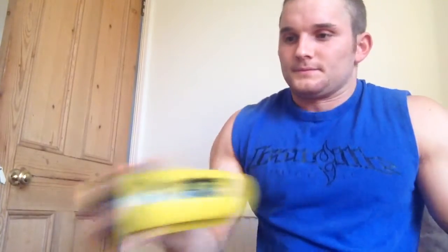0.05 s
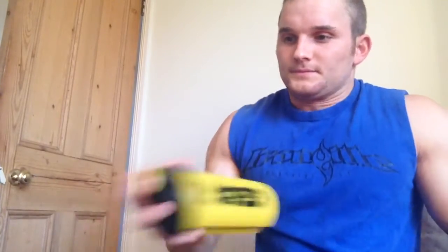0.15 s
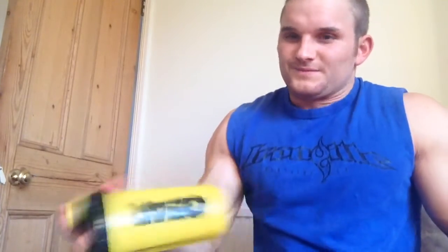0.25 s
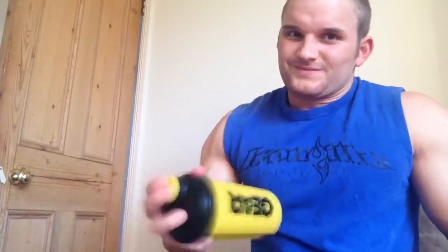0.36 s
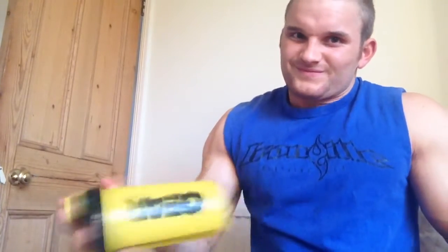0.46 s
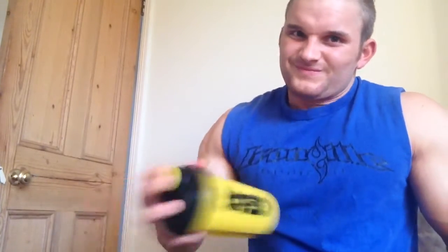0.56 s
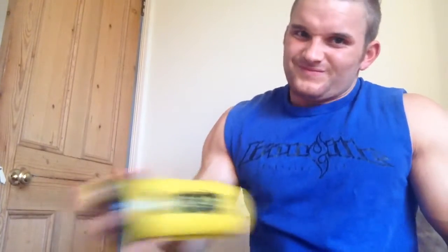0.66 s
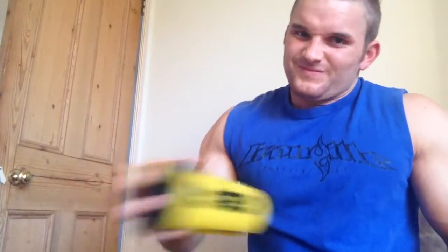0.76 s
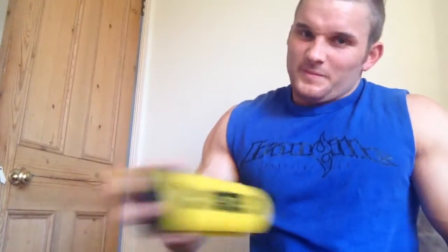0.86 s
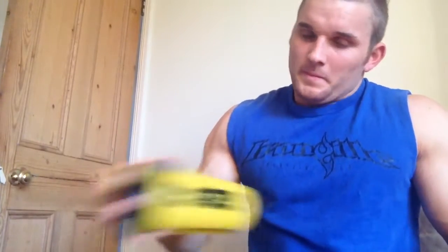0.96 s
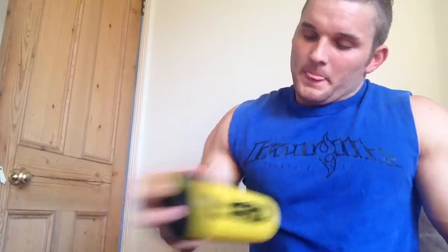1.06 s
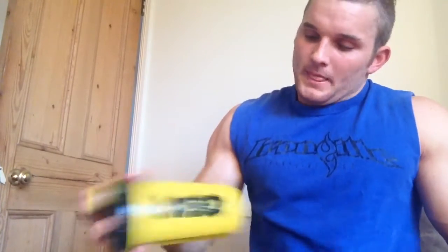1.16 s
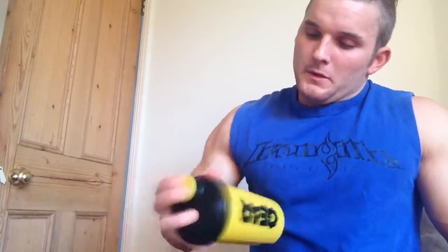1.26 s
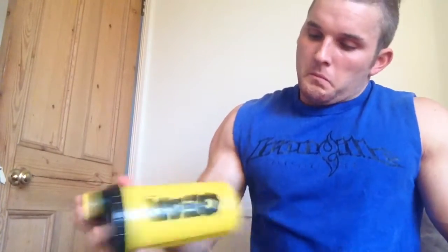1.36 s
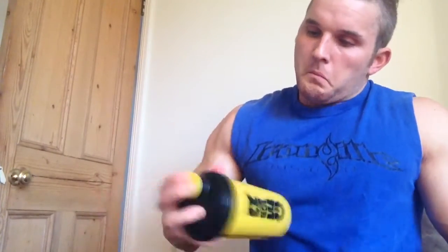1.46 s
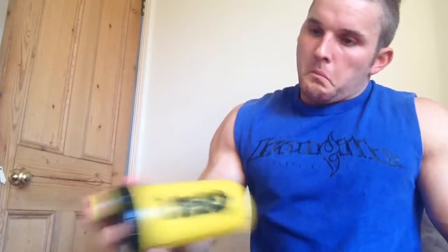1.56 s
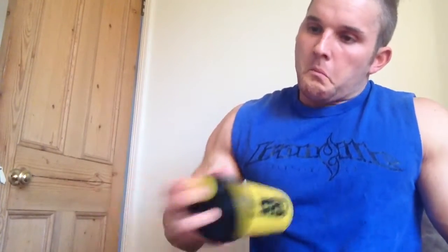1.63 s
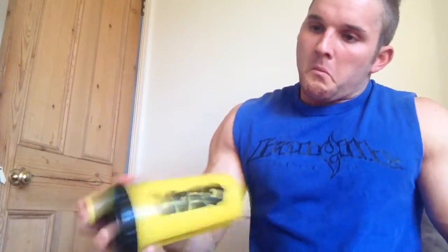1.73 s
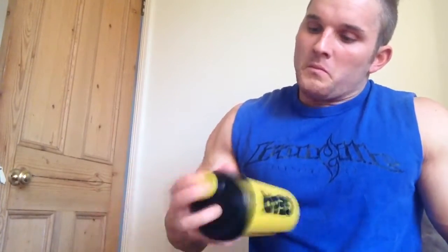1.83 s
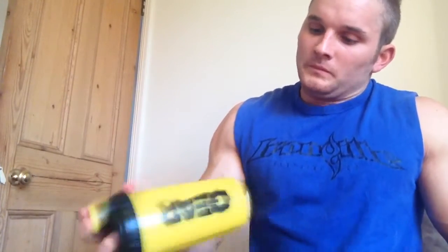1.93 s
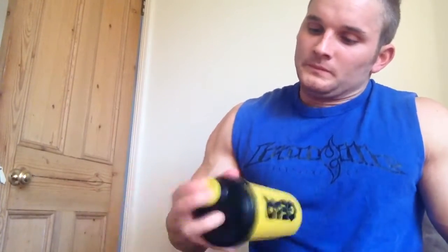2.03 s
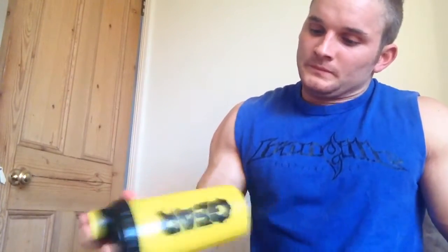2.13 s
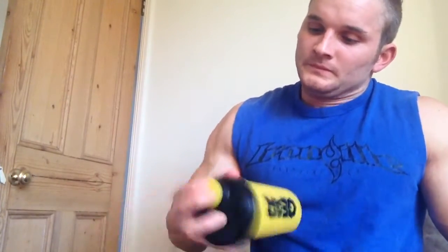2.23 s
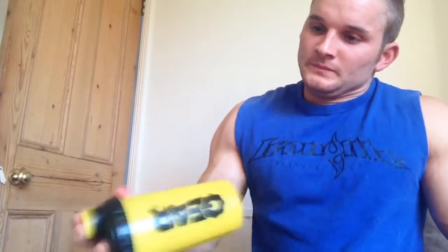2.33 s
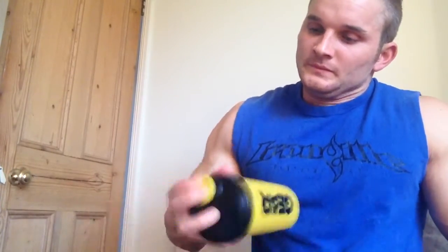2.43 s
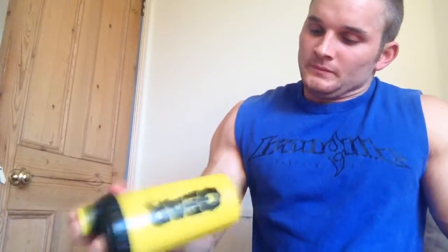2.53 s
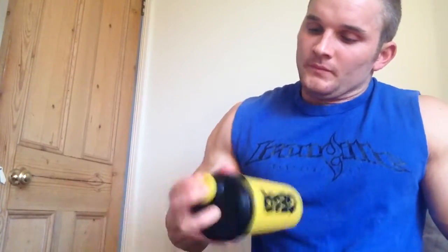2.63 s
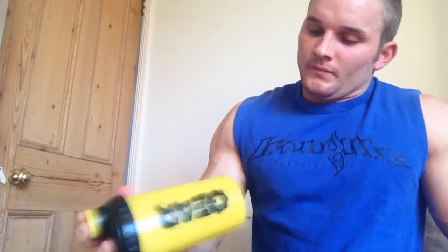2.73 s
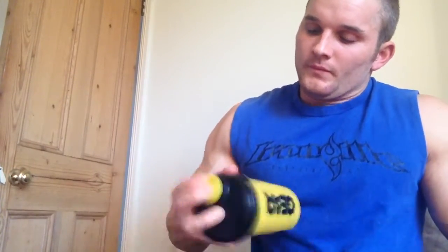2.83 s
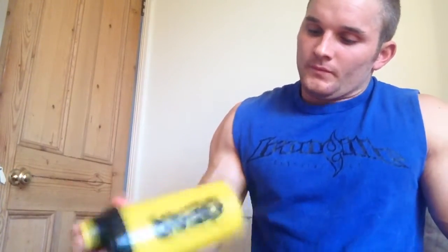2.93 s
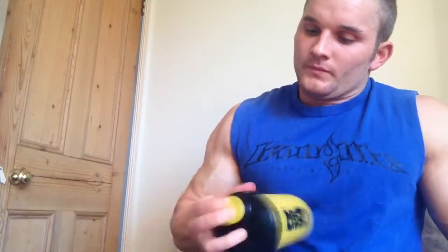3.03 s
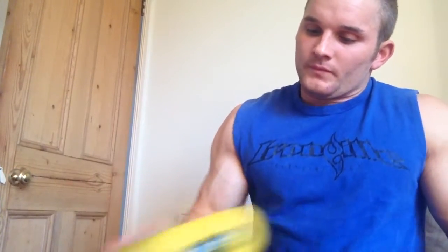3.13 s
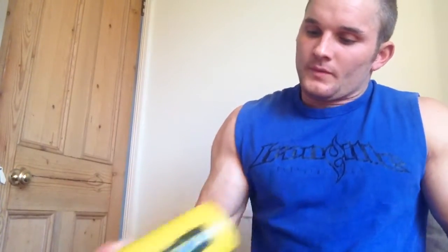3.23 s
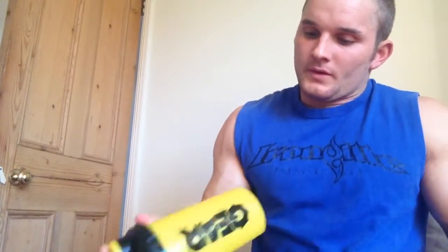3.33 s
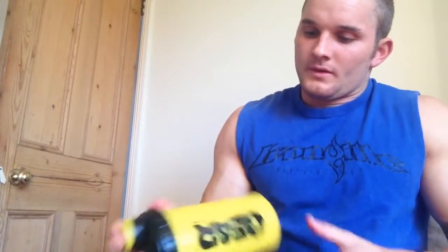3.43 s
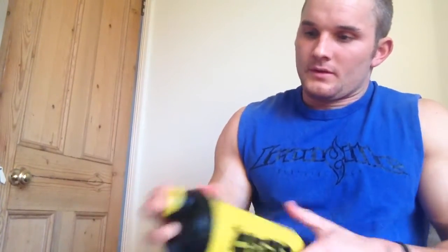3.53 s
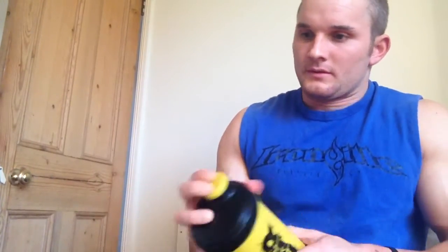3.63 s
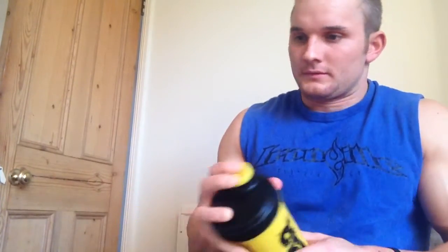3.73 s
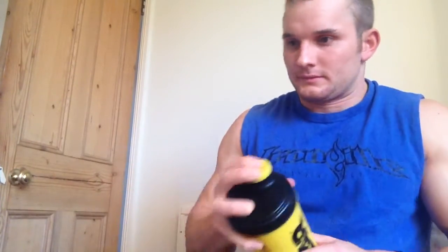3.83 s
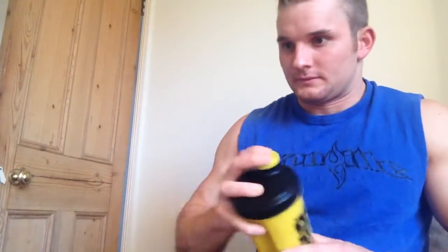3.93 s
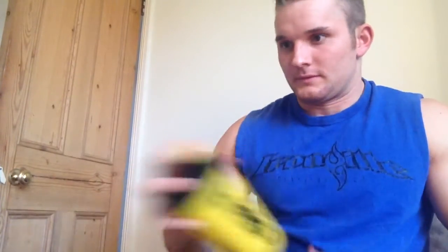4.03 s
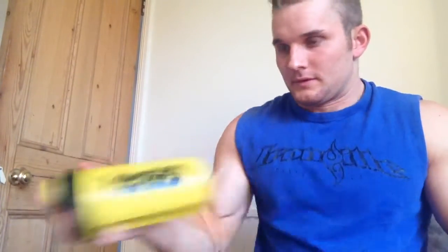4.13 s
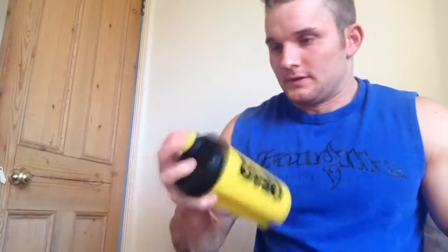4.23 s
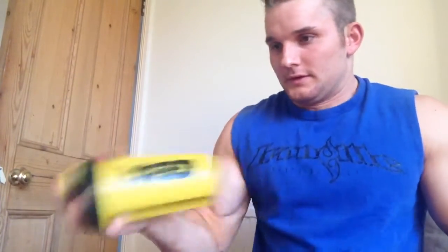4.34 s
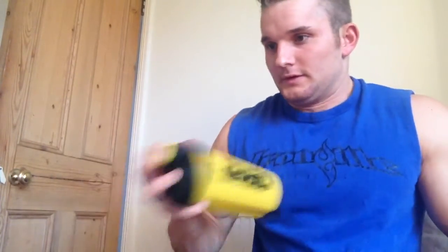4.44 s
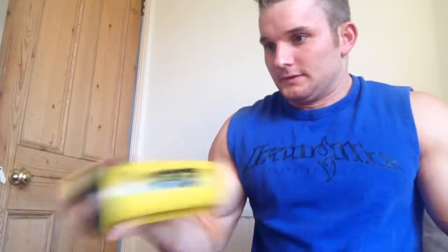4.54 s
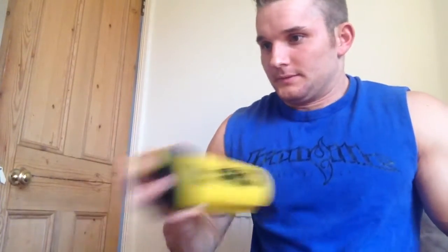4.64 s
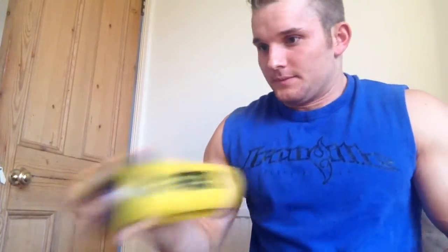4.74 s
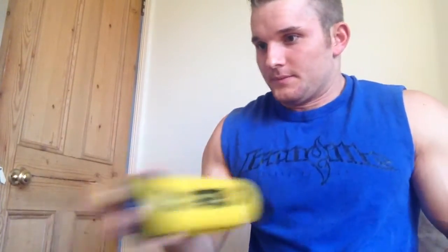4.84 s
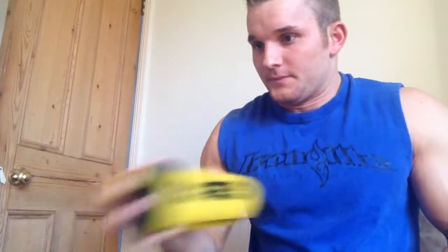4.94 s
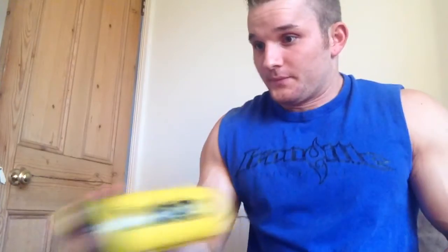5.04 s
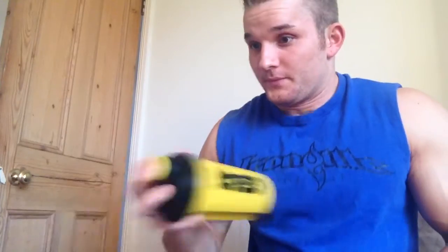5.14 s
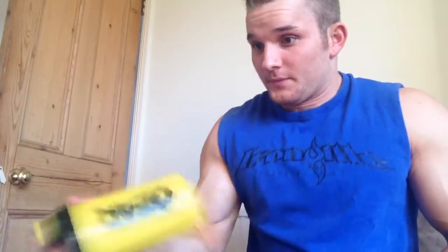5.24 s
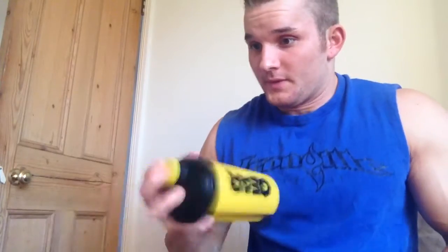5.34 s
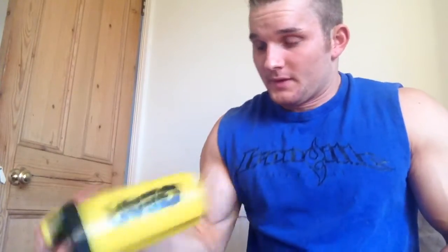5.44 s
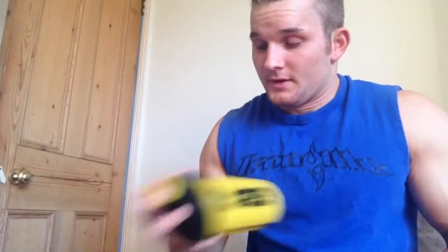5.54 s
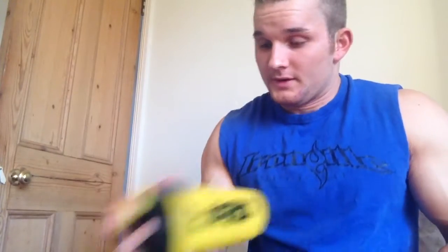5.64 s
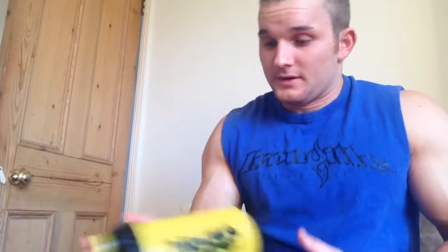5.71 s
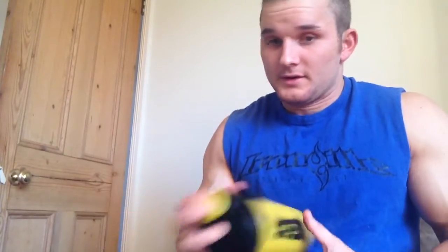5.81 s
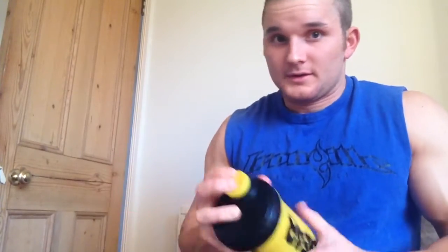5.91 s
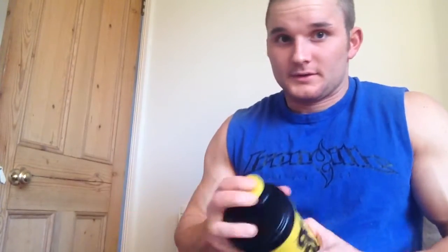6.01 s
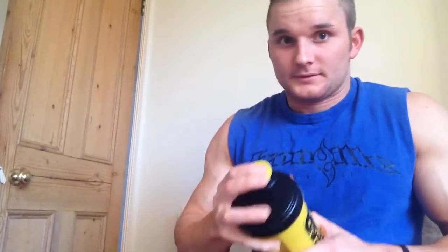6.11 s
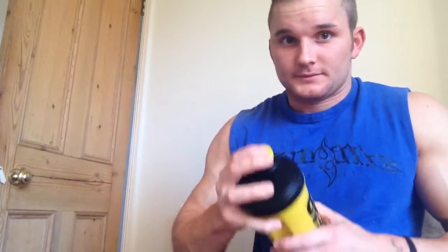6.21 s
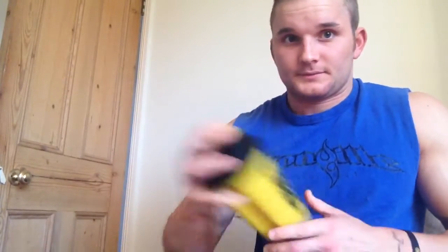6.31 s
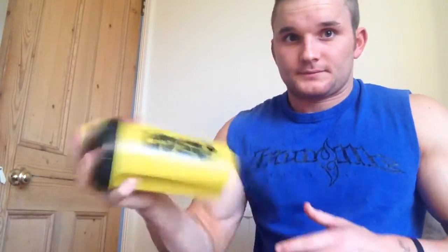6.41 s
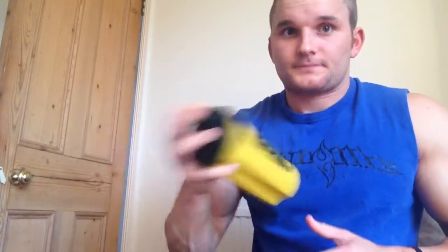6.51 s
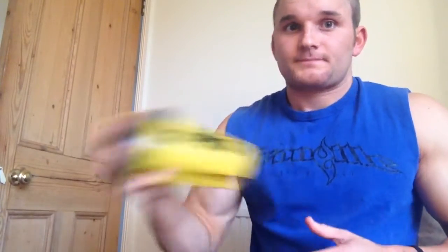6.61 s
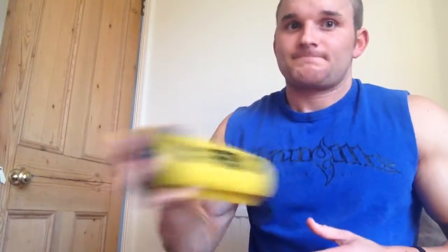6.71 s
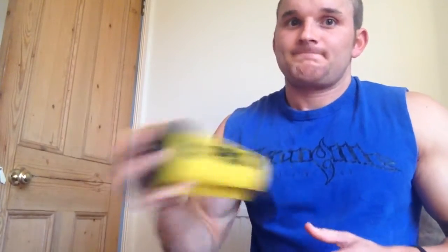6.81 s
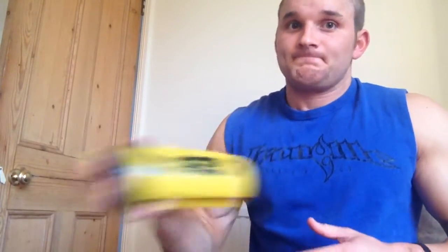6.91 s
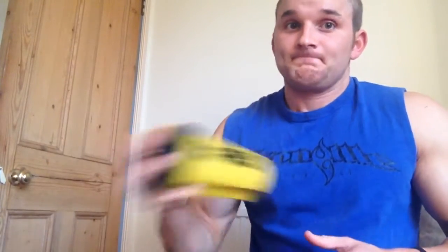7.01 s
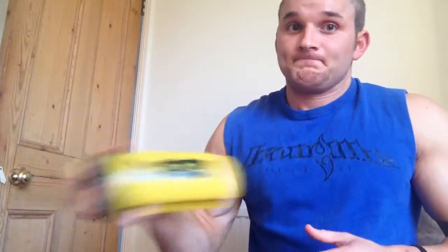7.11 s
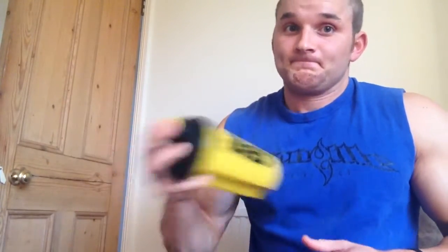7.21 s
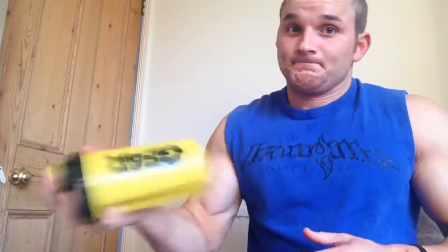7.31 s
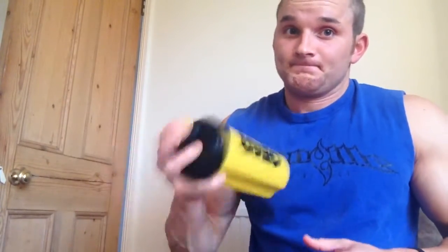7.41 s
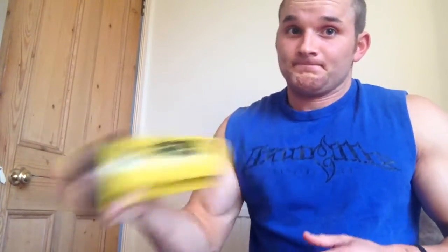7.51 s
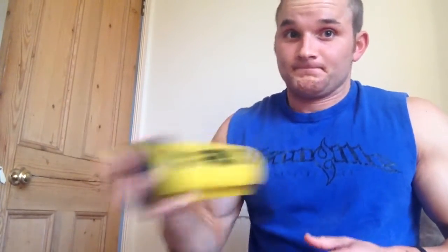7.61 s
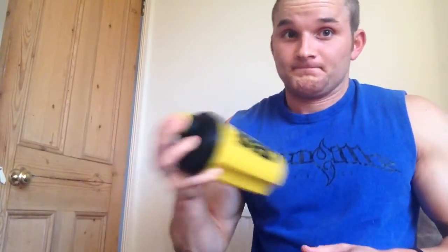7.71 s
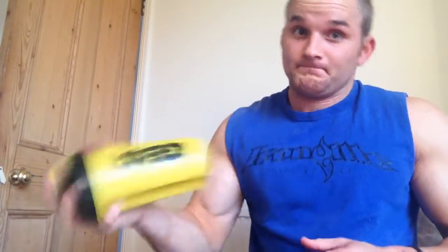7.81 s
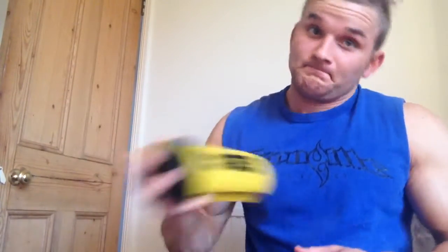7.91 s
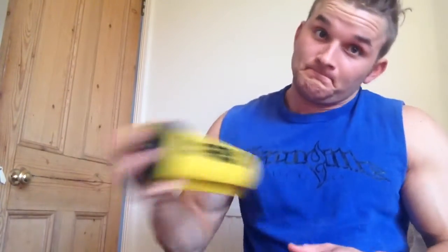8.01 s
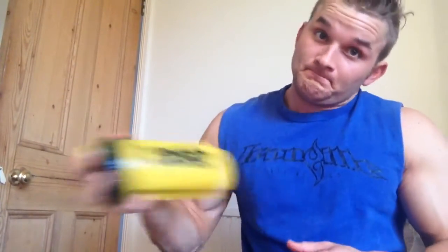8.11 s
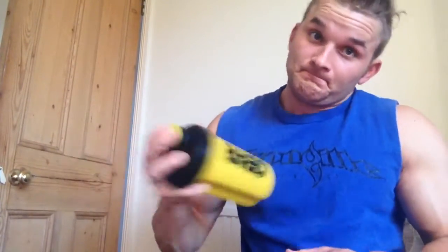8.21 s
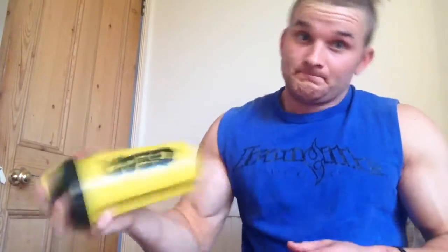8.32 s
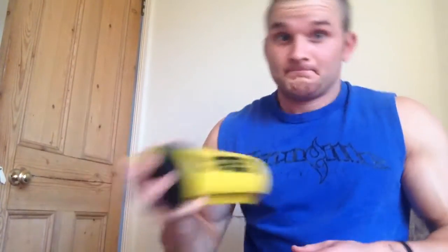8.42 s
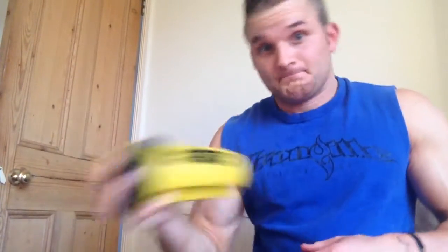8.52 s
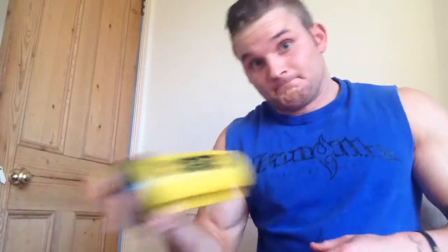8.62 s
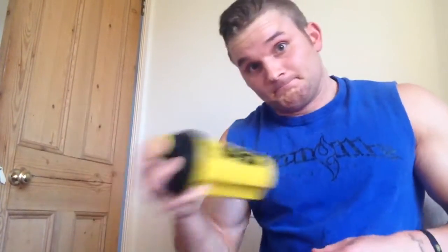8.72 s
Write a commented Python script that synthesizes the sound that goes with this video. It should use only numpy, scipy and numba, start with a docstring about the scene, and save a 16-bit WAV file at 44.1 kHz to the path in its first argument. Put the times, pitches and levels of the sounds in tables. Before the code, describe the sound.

Liquid splashes and fizzes inside a hollow plastic bottle, with rapid thumps and sharp rattling clacks, pausing twice before vigorous shaking resumes.

```python
"""A half-filled plastic shaker bottle is shaken hard in a small room, three bouts with short rests.
The liquid is clouds of ringing bubbles: gurgle, splash and fizz that surge with each stroke of the arm.
Damped sines and shaped noise make the hollow thumps of trapped air and the sharp clacks of plastic.
One microphone hears the bottle up close: the tail from the walls lies 11 dB under the direct sound.
Behind it stand faint hiss and a low drone."""
import sys
import numpy as np
from scipy import signal
from scipy.fft import rfft, irfft
from scipy.io import wavfile
from scipy.ndimage import map_coordinates
from numba import njit

SR = 44100
rng = np.random.default_rng(int(sys.argv[2]) if len(sys.argv) > 2 else 0)


def store_wav(level_fs):
    """Save 16-bit WAV to argv[1]."""
    pcm = np.round(np.clip(np.atleast_2d(level_fs), -1, 1) * 32767)
    wavfile.write(sys.argv[1], SR, pcm.T.astype(np.int16))


N = 386227
TIME = np.arange(N) / SR  # s
TOP_HZ = 15400  # upper edge of what the recorder keeps

# spectrum of the still room: f/Hz, relative level/dB
ROOM_COLOUR = [(30, -24.5), (60, -13.5), (85, -15.5), (140, -20), (250, -12.5), (800, -38), (2400, -29),
               (6000, -46.5), (15000, -37)]
ROOM_HISS_DB, ROOM_DRONE_DB = -68.5, -73.0

# the liquid lands and squeezes the trapped air: t/s, relative level/dB, f/Hz
AIR_THUMPS = [(0.479, -23, 404), (0.655, -29.5, 350), (0.735, -28, 506), (1.051, -17.5, 322),
              (1.259, -25, 800), (1.38, -26.5, 380), (1.414, -24, 327), (1.556, -31, 330),
              (2.797, -25.5, 355), (3.277, -29, 544), (3.682, -46, 348), (4.047, -33, 460),
              (4.222, -23.5, 336), (4.274, -29, 440), (4.387, -26, 890), (4.818, -25, 397),
              (5.012, -24.5, 440), (5.995, -38, 221), (6.028, -37.5, 450), (6.09, -46.5, 560),
              (6.497, -31.5, 358), (6.68, -20.5, 383), (7.083, -27.5, 374), (7.401, -27.5, 767),
              (7.556, -20, 392), (8.108, -26, 414), (8.355, -30, 360), (8.55, -27.5, 410)]

# sharp blows on the wall and lid: t/s, relative level/dB, treble level/dB, chatter t60/s
PLASTIC_BLOWS = [(0.147, -29, -6, 0.035), (0.195, -35, -17, .035), (0.3521, -36, -12, .03),
                 (0.4844, -35, -1, .026), (0.8832, -29, -13, 0.027), (1.054, -23, -5.5, 0.0092),
                 (1.0738, -30, -15, .009), (1.2607, -31, -7.5, .04), (1.417, -24.5, -12, 0.04),
                 (1.7122, -32, -2, 0.0078), (1.736, -32, 2, .016), (1.8192, -35, -10, .014),
                 (1.9468, -39.5, -10, .024), (1.9589, -38, 0.5, .004), (2.2, -31.5, -5, .035),
                 (2.2115, -34, 1, .014), (2.3845, -31, -2, .008), (2.697, -37, 4, 0.0091),
                 (2.7353, -35.5, 3.5, 0.016), (2.7978, -29.5, -3.5, .035), (2.8105, -31, -2, 0.011),
                 (2.9456, -33, 0, .013), (3.0079, -28, -7.5, .017), (3.217, -28.5, -7, 0.013),
                 (3.2819, -35, -3.5, 0.027), (3.7693, -46, -6.5, 0.0045), (3.8388, -49.5, -7.5, .008),
                 (4.05, -36.5, -6, 0.0067), (4.2191, -35, -12, .035), (4.277, -30, 2, 0.012),
                 (4.3301, -30.5, 2, .015), (4.389, -32, -5.5, .024), (4.573, -33.5, 1, 0.016),
                 (4.6285, -32, -7.5, .038), (4.7264, -31, -2, .01), (4.774, -37.5, 3.5, 0.0064),
                 (4.8212, -25, -10, .009), (4.8255, -27.5, -4, .013), (5.014, -25, -2, 0.025),
                 (5.1496, -32.5, -2, 0.017), (5.2119, -33.5, 0.5, .01), (5.2746, -29, -6.5, .025),
                 (5.3717, -29.5, -2, .038), (5.4525, -32.5, -6.5, .05), (5.5129, -28, -2, 0.032),
                 (5.6857, -33.5, -3.5, .026), (5.761, -34, -7, 0.03), (5.818, -43, 0, 0.032),
                 (6.0262, -46, -6, .014), (6.087, -47.5, -19, .009), (6.165, -58, -8, .025),
                 (6.2202, -42.5, -7.5, .006), (6.4592, -60.5, -6.5, .006), (6.5875, -33, -4.5, 0.017),
                 (6.6827, -26.5, -4.5, .033), (6.7839, -20.5, 1.5, 0.008), (6.7873, -23.5, -2.5, 0.037),
                 (6.8986, -28, 1, 0.047), (6.9096, -31.5, 3, .009), (7.084, -36.5, 1.5, 0.018),
                 (7.2164, -22, -7, 0.014), (7.2916, -35.5, 1.5, .01), (7.3285, -28, -2, .025),
                 (7.4391, -24.5, -6, 0.0095), (7.5061, -29, 0.5, 0.04), (7.5585, -30, 1, .013),
                 (7.673, -26, -0.5, 0.057), (7.8272, -28, -6, 0.025), (7.8415, -34, -1, .008),
                 (7.9003, -30, -2, .023), (7.9794, -22.5, -10.5, .016), (8.071, -36, -1, 0.0076),
                 (8.1121, -29, -3, 0.02), (8.232, -37.5, -7, .009), (8.2918, -33.5, 0, .018),
                 (8.355, -31.5, -3, .021), (8.474, -36, 0, .008), (8.4945, -38, 2, .005),
                 (8.5045, -34, 1.5, .024), (8.5158, -33, 2.5, 0.01), (8.7186, -28, -5.5, 0.024),
                 (8.7537, -31, -0.5, .005)]
# colour of a blow on the plastic: f/Hz, relative level/dB
PLASTIC_COLOUR = [(120, -38.5), (450, -4), (850, -1.5), (1300, -6), (2300, 5), (3500, 4.5), (4600, 6),
                  (6000, -5), (8000, -36.5)]
WALL_HZ, WALL_SCATTER_OCT = 2913, 0.28  # glancing blows stray further from the wall mode
WALL_SAG_OCT_PER_DB = 0.012  # a heavier blow bends more of the wall and rings lower

# colour of the liquid heard through the wall: f/Hz, relative level/dB
LIQUID_COLOUR = [(41, -56.5), (70, -11.5), (172, -12), (246, -1), (361, 1.5), (618, -2.5), (847, -3),
                 (1330, -15), (2430, -9.5), (2910, -12), (3810, -13.5), (4670, -15.5), (6250, -18.5),
                 (8560, -23), (15000, -28.5)]
# the liquid laps and the foam settles between the bouts: t/s, relative level/dB
LAPPING_LEVEL = [(3.4, -56), (3.52, -66), (4.03, -68), (4.15, -79), (5.85, -57.5), (6.08, -58), (6.14, -69),
                 (6.35, -81)]
# bouts keep the liquid swirling between strokes (the last bout takes two rows):
# start t/s, stop t/s, relative level/dB
SHAKING_BOUTS = [(0.11, 3.28, -47.5), (4.22, 5.75, -47), (6.499, 7.005, -46.5), (7.08, 8.76, -48)]
SWIRL_RISE_S, SWIRL_T60_S = 0.029, 0.43
SWIRL_GURGLE_DB, SWIRL_FIZZ_DB = -1.5, -12  # against the splash of the swirl
# strokes of the arm, each throwing the liquid against an end:
# crest t/s, force level/dB, rise t/s, delay until it falls back t/s
ARM_STROKES = [(0.017, -8.5, 0.0074, 0.092), (0.12, -3.5, 0.015, 0.1), (0.204, 1.5, 0.033, 0.1),
               (0.369, 1, 0.022, .12), (0.547, -.5, 0.038, 0.12), (0.665, -6, .015, .02),
               (0.734, 0.5, 0.012, .11), (0.895, 0, 0.012, 0.041), (1.06, 4.5, 0.0095, 0.072),
               (1.2, 1.5, 0.017, .1), (1.263, -1.5, 0.013, 0.13), (1.42, 3, 0.011, 0.059),
               (1.593, 0, 0.029, 0.079), (1.759, 0, 0.03, 0.093), (1.836, -3.5, 0.016, .125),
               (2.025, -2, 0.041, 0.038), (2.205, 1, 0.04, .043), (2.394, 4, 0.046, 0.055),
               (2.49, -3, 0.033, 0.054), (2.605, 2, 0.026, 0.042), (2.739, -0.5, 0.02, 0.076),
               (2.803, 0, 0.025, 0.048), (3.021, -0.5, 0.061, 0.031), (3.145, -4.5, .016, 0.01),
               (3.21, 0.5, 0.02, 0.079), (4.224, -1, 0.0083, 0.017), (4.283, -7, .005, 0.056),
               (4.396, 1.5, .008, .064), (4.588, -2.5, 0.019, 0.082), (4.778, -4, .012, 0.017),
               (4.838, 3.5, .008, 0.056), (5.025, 7, 0.014, 0.082), (5.156, -3, 0.015, 0.064),
               (5.283, 0.5, 0.021, 0.064), (5.38, -6, 0.033, 0.073), (5.513, 0.5, 0.009, 0.063),
               (5.692, -11, 0.015, 0.072), (5.82, -6.5, 0.019, 0.018), (6.527, -6.5, 0.019, .11),
               (6.69, 0, 0.012, 0.07), (6.787, 1.5, 0.0076, 0.12), (6.903, 1, 0.0064, 0.068),
               (7.093, -1.5, 0.013, 0.054), (7.183, -5, 0.1, 0.12), (7.336, 2, 0.007, 0.067),
               (7.566, 2, 0.0034, .075), (7.675, -10, .02, 0.11), (7.839, 0, .02, 0.084),
               (8.118, -2.5, .005, .065), (8.3, -10, 0.011, 0.028), (8.365, -1.5, 0.025, 0.07),
               (8.513, -5.5, 0.0091, 0.04), (8.613, 2, 0.02, 0.058)]
# how the liquid answers a stroke; rows are splash, gurgle, fizz:
# relative level at force 0/dB, growth with force/(dB per dB), settling t60/s, backwash against crest level/dB
STROKE_RESPONSE = [(-37, 1.05, 0.22, -7), (-40.5, 0.56, 0.22, -1), (-44.5, 1.12, 0.27, -15.5)]
BACKWASH_WIDTH_S = 0.022  # half the length of the gulp as the liquid falls back


def undb(db):
    """Amplitude factor of a level in dB."""
    return 10 ** (np.asarray(db) / 20)


def unit(x):
    """Scale to rms 1."""
    return x / np.sqrt(np.mean(x ** 2))


def burst(x):
    """Scale to the energy of 5 ms at rms 1."""
    return x * np.sqrt(SR / 200 / np.sum(x ** 2))


def add(out, s, sound):
    """Mix a sound in at time s, or at the start if s is negative."""
    i = max(int(s * SR), 0)
    out[i:i + len(sound)] += sound[:max(N - i, 0)]


def fade(t, t60):
    """Exponential decay, 60 dB in t60."""
    return np.exp(-np.log(1000) * t / max(t60, 1 / SR))


def band(x, lo_hz, hi_hz, order=2):
    """Butterworth band-pass."""
    edges = [lo_hz, min(hi_hz, SR / 2 - 1)]
    return signal.sosfilt(signal.butter(order, edges, "band", fs=SR, output="sos"), x)


def colour(x, points, size=4096):
    """Causal minimum-phase filter through (Hz, dB) points."""
    hz, db = np.transpose(points)
    grid = np.maximum(np.fft.rfftfreq(size, 1 / SR), 1)
    curve_db = np.interp(np.log(grid), np.log(hz), db)
    # folding the cepstrum onto positive time makes the response causal
    cepstrum = irfft(np.log(undb(curve_db)))
    cepstrum[1:size // 2] *= 2
    cepstrum[size // 2 + 1:] = 0
    response = irfft(np.exp(rfft(cepstrum)))
    return signal.fftconvolve(x, response)[:len(x)]


def room_tone():
    """Faint hiss over a low drone, both steady noise."""
    hiss, rumble = rng.standard_normal((2, N))
    drone = unit(band(rumble, 48, 55))
    return undb(ROOM_HISS_DB) * unit(colour(hiss, ROOM_COLOUR)) + undb(ROOM_DRONE_DB) * drone


def room(x, wet_db, low_t60, high_t60):
    """Close walls return a short dense tail of decaying noise, longest in the bass."""
    t = np.arange(SR // 2) / SR
    low, high = rng.standard_normal((2, len(t)))
    low_tail = undb(0.5) * band(low, 160, 1200) * fade(t, low_t60)
    high_tail = band(high, 900, 20700) * fade(t, high_t60)
    build_up = 1 - fade(t, 0.0062)
    tail = unit((low_tail + high_tail) * build_up) / np.sqrt(len(t))  # energy 1
    return x + undb(wet_db) * signal.fftconvolve(x, tail)[:N]


def swish():
    """One stroke swirls the liquid round the wall with a thin, pitched hiss of narrow-band noise."""
    swell = np.exp(-((TIME - 2.49) / 0.092) ** 2)
    return undb(-43.5) * swell * unit(band(rng.standard_normal(N), 4650, 4900, order=1))


def thumps():
    """The trapped air rings briefly under the landing liquid, with a rough wash around it."""
    out = np.zeros(N)
    t = np.arange(SR // 10) / SR
    for s, db, hz in AIR_THUMPS:
        cavity = np.sin(2 * np.pi * hz * t) * fade(t, .026) * (1 - fade(t, .008))
        noise = unit(band(rng.standard_normal(len(t)), 280, 690))
        wash = noise * fade(t, 0.053) * (1 - fade(t, 0.013))
        add(out, s + .0015, undb(db) * (undb(3.5) * cavity + undb(-8.5) * wash))
    return out


def clacks():
    """A blow cracks on the plastic, chatters briefly and rings one heavily damped wall mode."""
    out = np.zeros(N)
    t = np.arange(SR // 20) / SR
    usual_db = np.median([row[1] for row in PLASTIC_BLOWS])
    for s, db, treble_db, chatter_t60 in PLASTIC_BLOWS:
        # a soft, square blow goes into the wall mode; a hard, glancing one cracks
        ringing = 1 / (1 + undb(treble_db + 7.5) ** 2.7)
        spot = rng.uniform(-1, 1)  # where on the wall it lands
        scatter_oct = WALL_SCATTER_OCT * spot * (1 - ringing) ** 2
        hz = WALL_HZ * 2 ** (scatter_oct - WALL_SAG_OCT_PER_DB * (db - usual_db))
        contact, chatter = rng.standard_normal((2, len(t)))
        blow = burst(contact * fade(t, 0.0031)) + undb(3) * burst(chatter * fade(t, chatter_t60))
        crack = burst(colour(blow, PLASTIC_COLOUR))
        mode = burst(np.sin(2 * np.pi * hz * t) * (1 - fade(t, 0.0023)) * fade(t, 0.0069))
        snap = burst(band(band(blow, 5000, TOP_HZ), 1500, 10000, order=1))
        body = np.sqrt(ringing) * mode + np.sqrt(1 - ringing) * crack
        add(out, s, undb(db + 1.0) * (body + undb(treble_db - 1.8) * snap))
    return out


def ticks(per_s):
    """Sparse small impacts of uneven size on the plastic, each a 5 ms grain of noise."""
    when, size = rng.random((int(per_s * N / SR), 2)).T
    t = np.arange(SR // 200) / SR
    hits = np.zeros(N)
    hits[(when * N).astype(int)] = size ** 2
    grit = signal.fftconvolve(hits, fade(t, 0.026))[:N] * rng.standard_normal(N)
    return unit(colour(grit, PLASTIC_COLOUR) + undb(-4) * band(grit, 5300, TOP_HZ))


@njit
def ring(start, hz, cycles, size, glide):
    """Sum of damped sines; a positive glide raises their pitch as they fade."""
    out = np.zeros(N)
    for k in range(len(start)):
        n = int(cycles[k] * SR / hz[k]) + 2
        phase, a, loss = 0., size[k], np.exp(-6. / n)
        for i in range(min(n, N - start[k])):
            phase += 2 * np.pi * hz[k] * (1 + glide * i / n) / SR
            a *= loss
            out[start[k] + i] += a * np.sin(phase)
    return out


def churn(s, hz, per_s, per_octave):
    """Smooth chance over time and pitch: bubbles of like size come in clumps."""
    field = rng.standard_normal((1024, 64))
    place = [s * per_s, np.log2(hz / 20) * per_octave]
    return 1.03 * map_coordinates(field, place, order=1, mode="wrap")


def bubbles(per_s, lo_hz, hi_hz, cycles, spread_db, clump_db, glide):
    """A cloud of bubbles of random pitch and strength, heard through the bottle wall."""
    when, pitch, life, size, sign = rng.random((int(per_s * N / SR), 5)).T
    hz = lo_hz * (min(hi_hz, TOP_HZ) / lo_hz) ** pitch
    clumps = churn(when * N / SR, hz, per_s=35, per_octave=2.988)
    db = -spread_db * np.log(np.maximum(size, .02)) + clump_db * clumps
    # small bubbles ring briefly, so need more amplitude for the same loudness
    strength = undb(db) * hz * np.sign(sign - .5)
    cloud = ring((when * N).astype(np.int64), hz, cycles * (.5 + life), strength, float(glide))
    return unit(colour(band(cloud, lo_hz, hi_hz, order=3), LIQUID_COLOUR))


def swirl():
    """Level of the liquid's restless motion: up with each bout, dying away to a faint lapping."""
    level = undb(np.interp(TIME, *np.transpose(LAPPING_LEVEL)))
    for start, stop, db in SHAKING_BOUTS:
        attack = np.clip((TIME - start) / SWIRL_RISE_S, 0, 1)
        decay = fade(np.maximum(TIME - stop, 0), SWIRL_T60_S)
        level = np.hypot(level, undb(db) * attack * decay)
    return level


def surges():
    """Levels of splash, gurgle and fizz: each stroke swells, breaks, settles and falls back with a gulp."""
    power = (undb([[0], [SWIRL_GURGLE_DB], [SWIRL_FIZZ_DB]]) * swirl()) ** 2
    t = np.arange(-SR // 6, SR // 2) / SR  # from the crest
    for s, force_db, rise_s, back_s in ARM_STROKES:
        swell = np.exp(-(np.minimum(t, 0) / max(rise_s, .003)) ** 2)
        backwash = np.exp(-((t - back_s) / BACKWASH_WIDTH_S) ** 2)
        for layer, (db, growth, t60, back_db) in zip(power, STROKE_RESPONSE):
            settling = swell * fade(np.maximum(t, 0), t60)
            shape = np.hypot(settling, undb(back_db) * backwash)
            audible = shape[t + s >= 0]  # drop what falls before time 0
            add(layer, s + t[0], (undb(db + growth * force_db) * audible) ** 2)
    return np.sqrt(power)


def liquid():
    """Big air pockets gurgle, small ones splash, the foam fizzes, and stray drops tick on the wall."""
    splash, gurgle, fizz = surges()
    pockets = bubbles(per_s=400, lo_hz=90.0, hi_hz=1394, cycles=11.6, spread_db=3.0, clump_db=2.0, glide=0.12)
    drops = bubbles(per_s=4200, lo_hz=984, hi_hz=5970, cycles=22.0, spread_db=3.0, clump_db=4.5, glide=.03)
    foam = bubbles(per_s=9000, lo_hz=5490, hi_hz=15700, cycles=6.1, spread_db=3.5, clump_db=3.6, glide=0)
    spatter = undb(-1.0) * drops + undb(-8.5) * ticks(per_s=55)
    return undb(-1.0) * gurgle * pockets + splash * spatter + undb(0.5) * fizz * foam


def scene():
    """The bottle in the room, one channel."""
    bottle = swish() + thumps() + clacks() + liquid()
    return (room_tone() + room(bottle, wet_db=-11.0, low_t60=0.37, high_t60=0.32))[None]


def record(dry):
    """The recorder cuts the top with a steep low-pass."""
    return signal.sosfilt(signal.ellip(10, .2, 70, TOP_HZ, fs=SR, output="sos"), dry)


dry = scene()
out = record(dry)
store_wav(out)
```